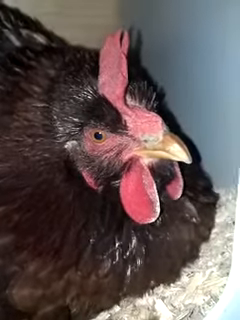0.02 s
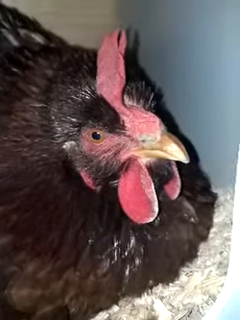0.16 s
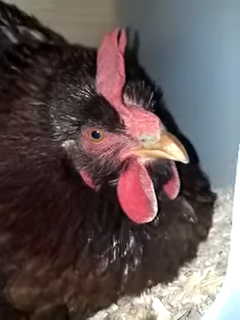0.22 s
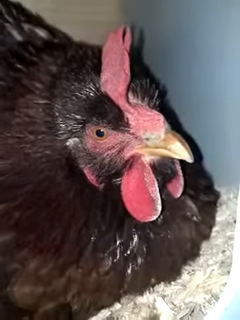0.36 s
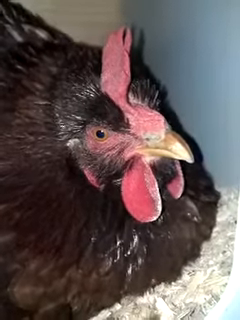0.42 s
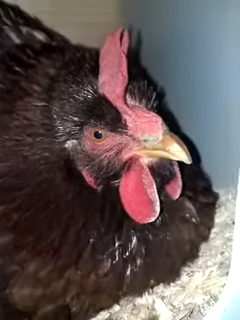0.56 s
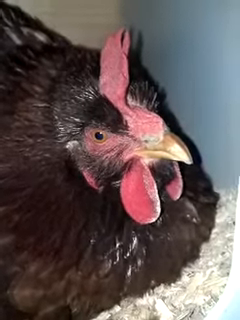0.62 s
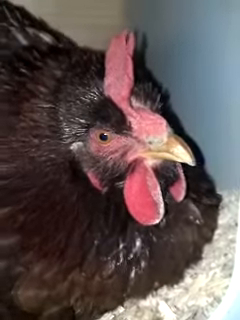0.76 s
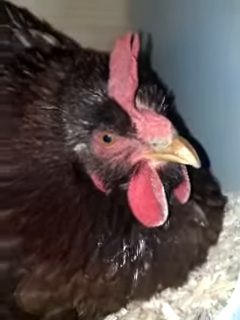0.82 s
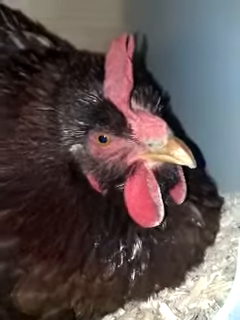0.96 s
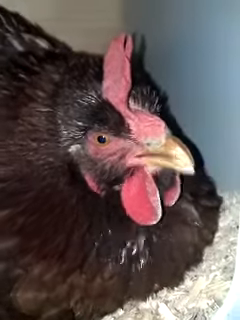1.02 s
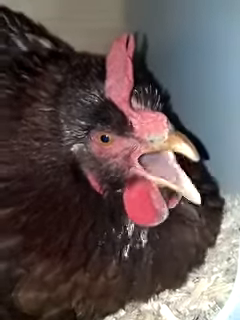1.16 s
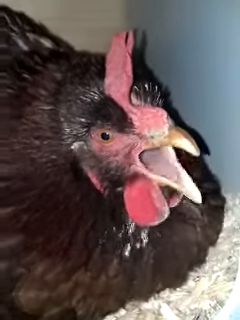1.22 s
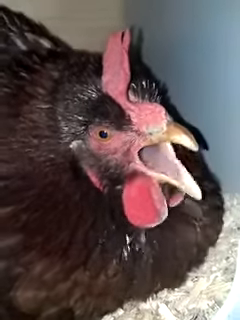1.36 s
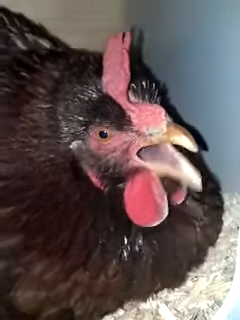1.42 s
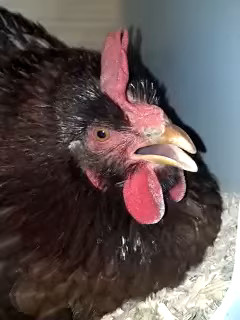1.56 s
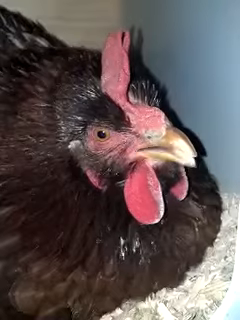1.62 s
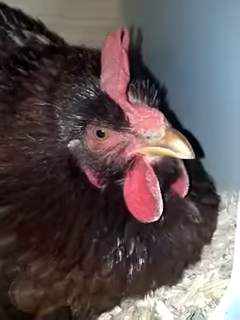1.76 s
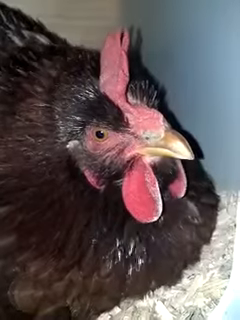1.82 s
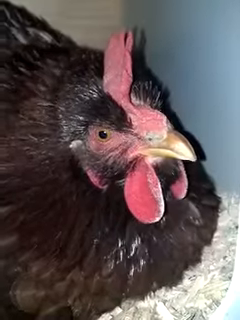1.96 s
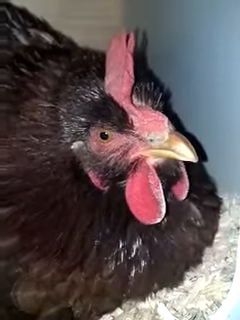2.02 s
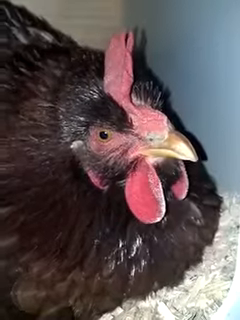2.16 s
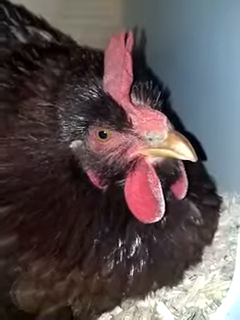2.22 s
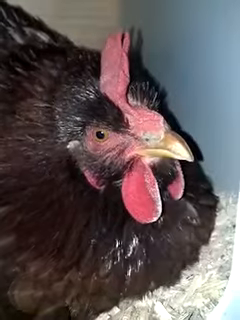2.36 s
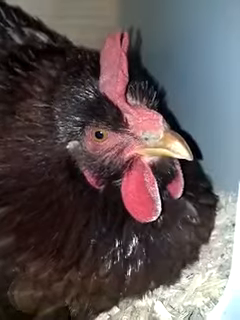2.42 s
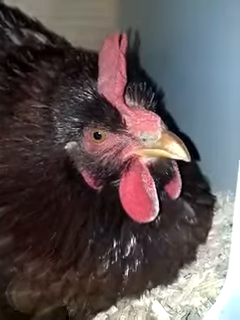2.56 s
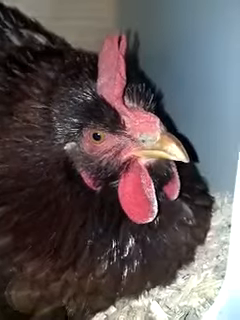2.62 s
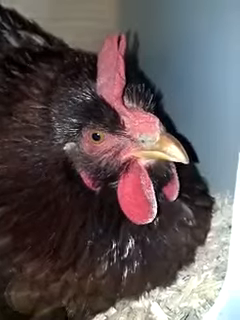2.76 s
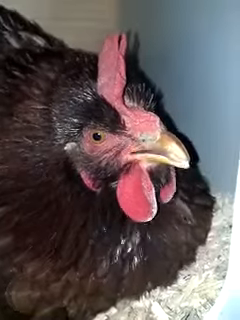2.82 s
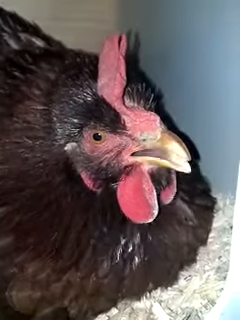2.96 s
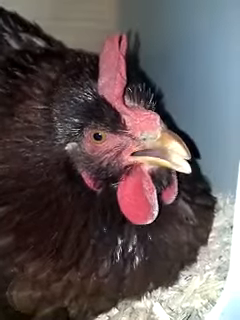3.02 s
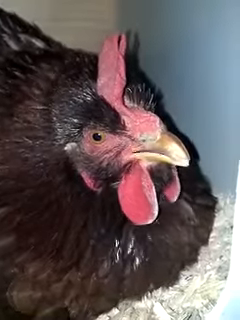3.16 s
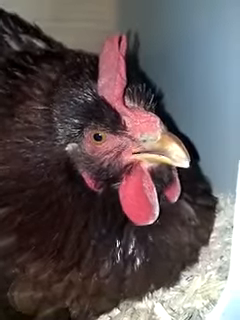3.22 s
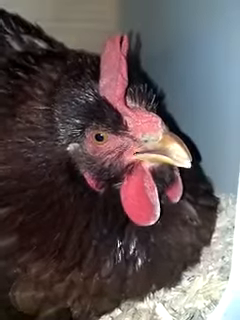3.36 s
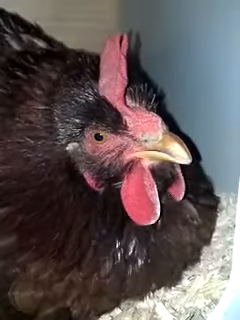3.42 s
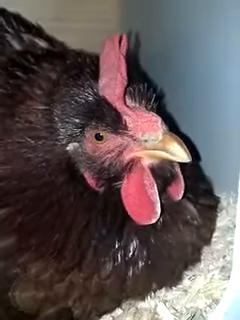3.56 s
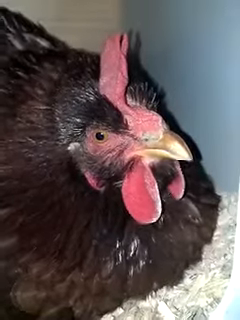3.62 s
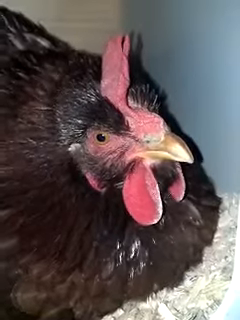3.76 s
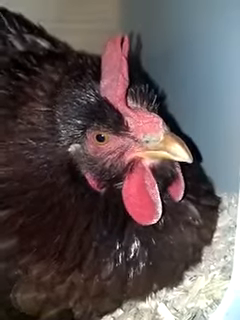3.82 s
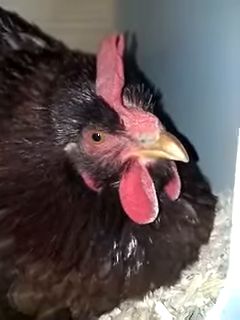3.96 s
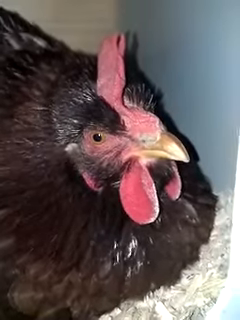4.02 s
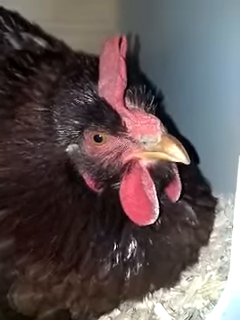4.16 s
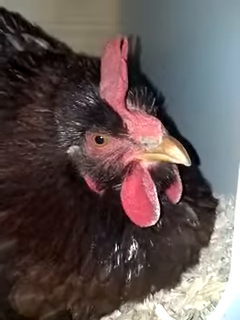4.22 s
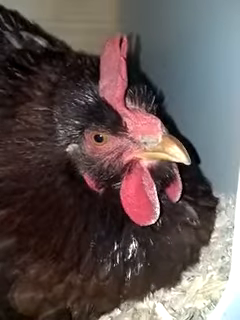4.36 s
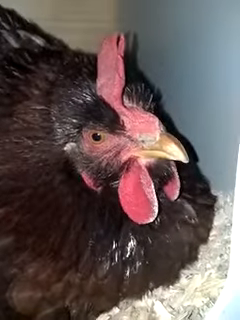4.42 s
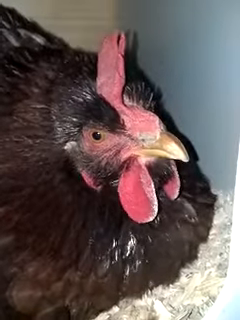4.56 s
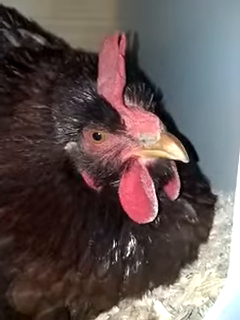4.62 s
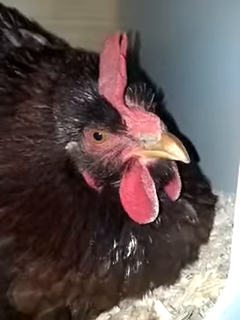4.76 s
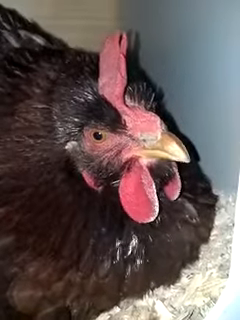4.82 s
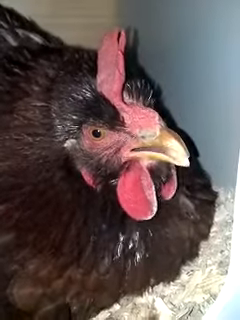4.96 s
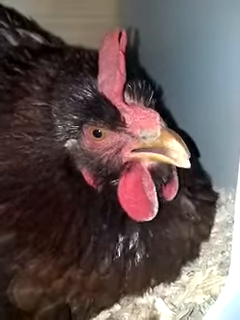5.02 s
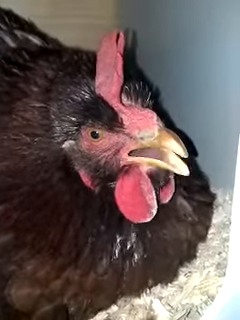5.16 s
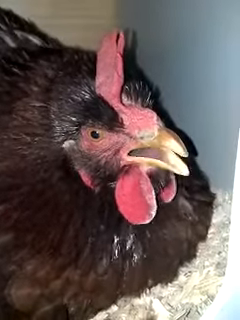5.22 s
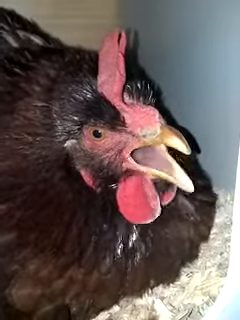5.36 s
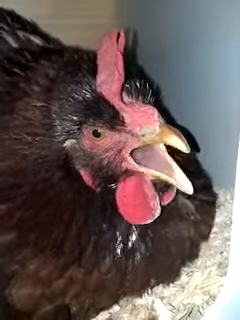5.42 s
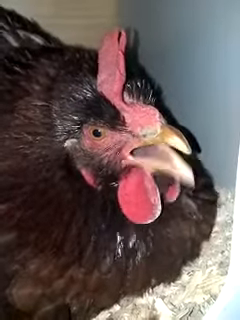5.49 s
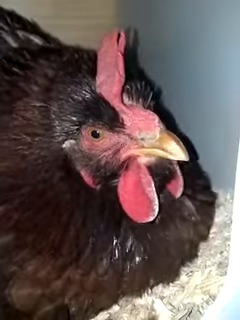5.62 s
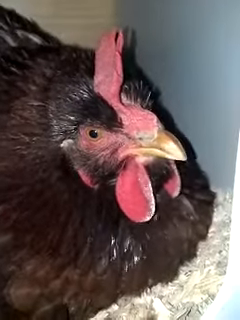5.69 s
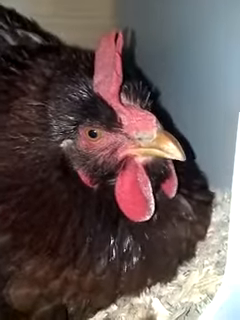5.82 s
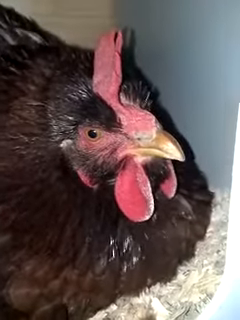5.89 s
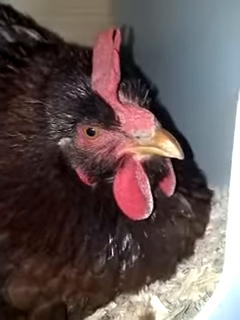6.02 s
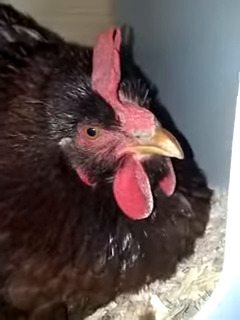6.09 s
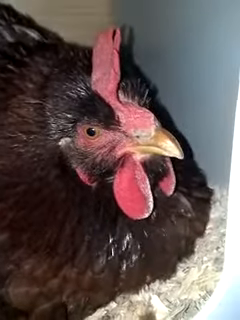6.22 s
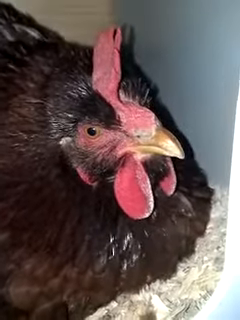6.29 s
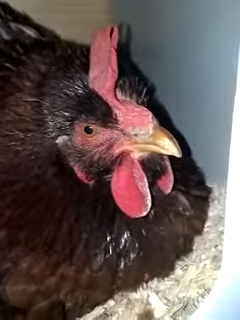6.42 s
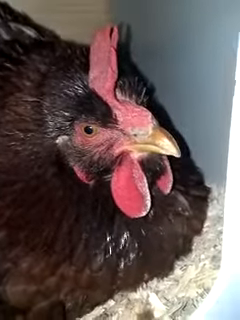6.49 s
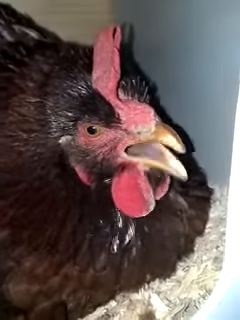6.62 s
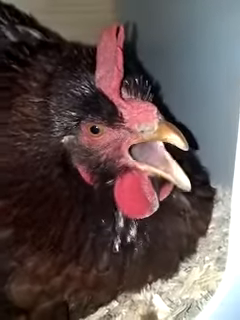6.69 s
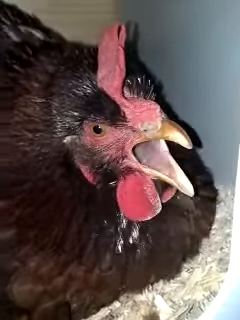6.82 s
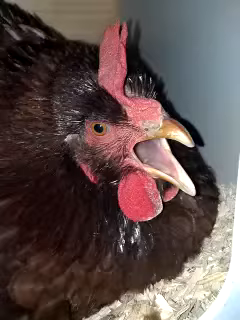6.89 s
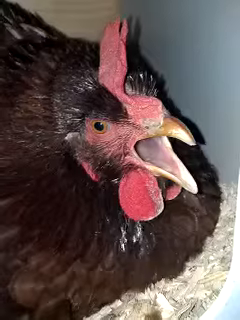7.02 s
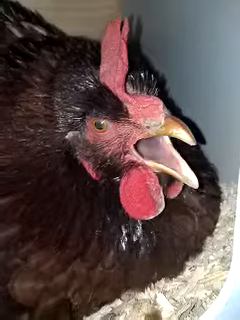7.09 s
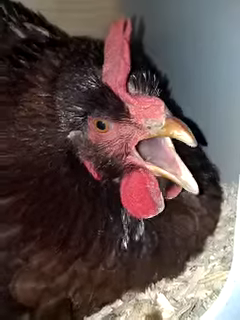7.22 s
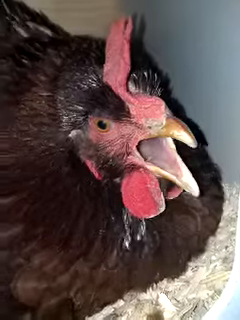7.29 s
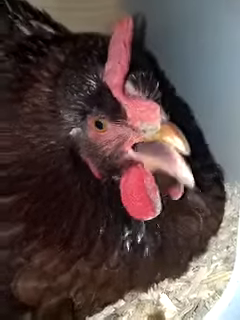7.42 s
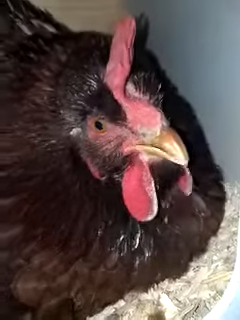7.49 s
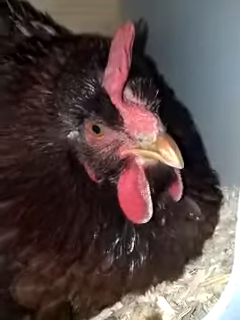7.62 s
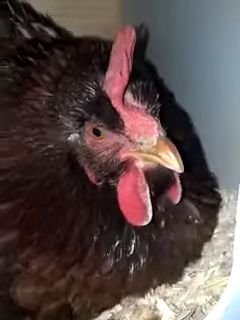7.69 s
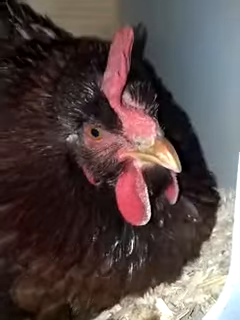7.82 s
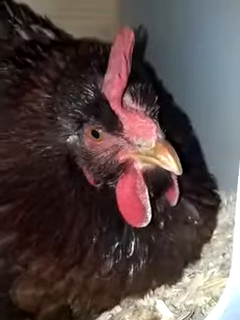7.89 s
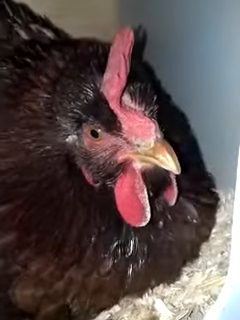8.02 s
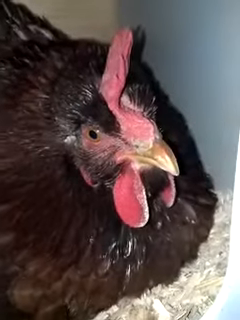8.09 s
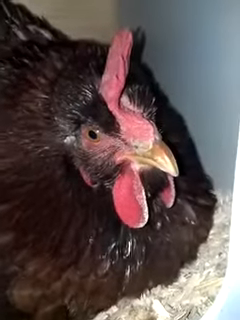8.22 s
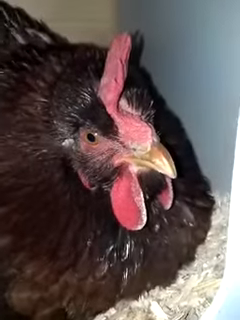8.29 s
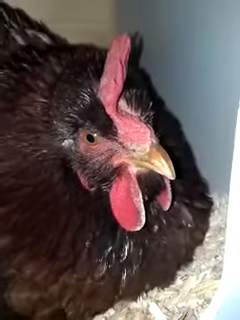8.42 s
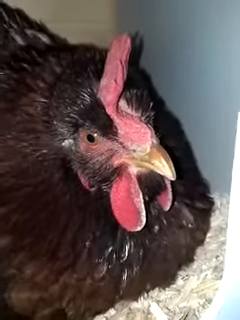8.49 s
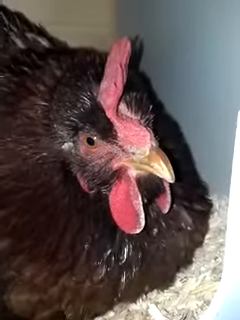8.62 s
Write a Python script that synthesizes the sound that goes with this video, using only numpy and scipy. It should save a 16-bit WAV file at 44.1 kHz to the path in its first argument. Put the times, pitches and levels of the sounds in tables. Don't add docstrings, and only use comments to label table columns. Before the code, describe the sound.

Close stereo pickup of a hen in a boarded nest box with a brief woody ring. Dry, rough clucks come in short runs, separated by four harsh drawn-out calls of about half a second to nearly a second, some ending in a clean falling tone. Two squawks slide upward in pitch, the first much louder. Far low droning and soft airy hiss fill the gaps, sinking after loud calls.

```python
import sys
import numpy as np
from scipy import signal
from scipy.fft import rfft, irfft, next_fast_len
from scipy.io import wavfile
from scipy.ndimage import uniform_filter1d

SR = 44100
rng = np.random.default_rng(int(sys.argv[2]) if len(sys.argv) > 2 else 0)


def voltage_ratio(level):
    return 10 ** (np.asarray(level, float) / 20)


def generate_wav(sig):
    pcm = np.round(np.clip(np.atleast_2d(sig).T, -1, 1) * 32767).astype(np.int16)
    wavfile.write(sys.argv[1], SR, pcm)


N = 381906


def unit(x):
    return x / np.sqrt(np.mean(x ** 2) + 1e-20)


def curve(rows, column):
    rows = np.array(rows)
    return np.interp(np.arange(N) / SR, rows[:, 0], rows[:, column])


def bursts(tables, fade_s=0.012):
    rows = np.concatenate(tables)
    t = np.arange(N) / SR
    gate = 0
    for table in tables:
        inside_s = np.minimum(t - table[0][0], table[-1][0] - t)
        gate = gate + np.clip(inside_s / fade_s + .5, 0, 1)
    return [gate] + [curve(rows, k) for k in range(1, rows.shape[1])]


def drift(rate_hz):
    r = np.exp(-2 * np.pi * rate_hz / SR)
    wander = signal.lfilter([1], [1, -2 * r, r * r], rng.standard_normal(N + 9000))
    return unit(wander[9000:])


def resonate(x, modes):
    out = 0
    for k, (hz, width_hz, db) in enumerate(modes):
        r = np.exp(-np.pi * width_hz / SR)
        ring = signal.lfilter([1, 0, -1], [1, -2 * r * np.cos(2 * np.pi * hz / SR), r * r], x)
        out = out + (-1) ** k * voltage_ratio(db) * (1 - r * r) / 2 * ring
    return out


def even(x, span_s=0.14):
    return x / np.sqrt(uniform_filter1d(x ** 2, int(span_s * SR)) + 1e-12)


def steep(x, low_hz):
    return signal.sosfilt(signal.butter(4, low_hz, "high", fs=SR, output="sos"), x)


def rumble():
    modes = [(127.0, 2.2, 8), (171.7, 67, 3.0), (78.0, 56, -8.0)]   # (Hz, width Hz, dB)
    left, other = [unit(resonate(rng.standard_normal(N), modes)) for side in range(2)]
    level = voltage_ratio(-49 + 3.5 * drift(4.5))
    return level * np.array([left, 1.2 * other - 0.28 * left])


# (frequency [Hz], level per Hz [dB])
HISS = [(200, 14), (300, 2), (450, 6.5), (1000, 1), (1600, -6.5), (2700, -14), (4000, -15), (6000, -22.5),
        (10000, -27.5)]


def hiss():
    hz, points = np.fft.rfftfreq(N, 1 / SR) + 1, np.array(HISS)
    level_db = np.interp(np.log(hz), np.log(points[:, 0]), points[:, 1])
    gain = voltage_ratio(level_db) / (1 + (180 / hz) ** 4)
    return unit(irfft(rfft(rng.standard_normal(N)) * gain, N))


# (time [s], length [s], level [dB], pitch [Hz])
DRONE = [(.32, 0.14, -52.5, 112), (0.726, 0.96, -54, 163), (.9, 0.12, -55, 148.4), (2.17, 0.089, -48, 129),
         (3.3, .3, -59, 130), (4.076, 0.49, -57.5, 112), (4.58, 0.094, -62, 112), (5.032, 0.3, -50.5, 125),
         (6.15, .08, -57.5, 115), (6.331, 0.14, -54, 115.2), (6.547, 0.13, -54, 130),
         (7.397, 0.16, -53, 122), (8.357, 0.29, -57.5, 105)]


def drone():
    t = np.arange(N) / SR
    turn = 2 * np.pi * np.cumsum(np.exp(0.017 * drift(3.4))) / SR
    port_phase_rad = np.array([[0], [1.97]])
    swells = 0
    for s, length, db, hz in DRONE:
        swell = voltage_ratio(db) * np.exp(-(2 * (t - s) / length) ** 2)
        swells = swells + swell * np.sin(hz * turn + port_phase_rad)
    return swells * voltage_ratio(5.0 + 2.0 * drift(8))


def flapping(rate_hz, jitter, shimmer_db, throb_db, stray_per_s):
    cycles = np.cumsum(rate_hz * np.exp(jitter * drift(250))) / SR
    closes = np.diff(np.floor(cycles), prepend=0) > 0
    stray = (rng.random(N) < stray_per_s / SR) * rng.choice([-1, 1], N)
    beat = np.cumsum(49 * np.exp(.09 * drift(10))) / SR % 1
    burst = np.minimum(20 * beat, 2 - 2 * beat) - 1
    throb = throb_db * burst * voltage_ratio(1.5 * drift(12))
    strength = voltage_ratio(shimmer_db * rng.standard_normal(N) + throb + 0.65 * drift(45))
    slaps = (closes + 0.84 * stray) * strength
    puffs = signal.lfilter([1], [1, -.93], np.abs(slaps)) * rng.standard_normal(N)
    return slaps + 1e-18, slaps + 0.23 * puffs


# (time [s], peak level [dB], length [s], middle band against peak [dB])
CLUCKS = [(0.404, -31.5, 0.1, -33), (0.656, -31, 0.082, -34), (0.928, -25, 0.088, -19),
          (1.823, -37.5, .06, -14.5), (2.045, -35.5, .08, -14), (2.249, -31, 0.08, -12.5),
          (2.519, -29, 0.095, -16), (2.734, -25.5, 0.097, -20), (3.722, -28, 0.16, -16),
          (3.923, -24.5, 0.14, -18), (4.145, -22, 0.26, -15.5), (4.867, -19.5, 0.12, -15),
          (6.141, -37.5, 0.05, -14.5), (6.352, -32, 0.12, -14.5), (7.604, -34.5, 0.12, -11.5),
          (8.299, -25, 0.32, -11), (8.641, -30, 0.04, -8.5)]
# (frequency [Hz], width [Hz], level [dB])
THROAT_SHUT = [(600, 490, -7.5), (847, 121.6, 8), (1077, 56.4, 5.5), (1250, 530, -14.5), (2013, 250, -18.5),
               (2800, 120, -25)]
# (frequency [Hz], width [Hz], level [dB])
BEAK = [(2050, 350, -6), (2450, 300, -5), (2950, 260, -3), (3500, 220, 1), (4000, 220, -2), (4400, 300, -6),
        (4900, 500, -11)]
# (frequency [Hz], width [Hz], level [dB])
BEAK_TOP = [(5500, 700, -7), (6050, 300, -4), (6400, 250, -1), (6800, 250, 0), (7350, 250, -4),
            (8250, 500, -4), (9000, 450, -3), (9650, 350, -6), (10700, 600, -11)]


def clucks():
    attack_s, start_db, fall_db_per_s, slap_db = 0.037, -11.5, 518.5, 7.5
    tables = []
    opening = np.zeros(N)
    for s, db, length, mid_db in CLUCKS:
        fall_s = length - .03
        peak_s = s + attack_s
        tables.append([(s, db + start_db, mid_db), (peak_s, db, mid_db),
                       (peak_s + fall_s, db - fall_db_per_s * fall_s, mid_db)])
        opening[round((s + .003) * SR)] = voltage_ratio(db + slap_db)
    gate, low_db, mid_db = bursts(tables, fade_s=.002)
    slaps, airy = flapping(410, jitter=.16, shimmer_db=2.5, throb_db=1.0, stray_per_s=270)
    low = even(steep(resonate(slaps, THROAT_SHUT), 260), span_s=0.032)
    mid = voltage_ratio(mid_db - 9.0) * even(steep(resonate(airy, BEAK), 1600), span_s=0.0068)
    top = voltage_ratio(mid_db - 19.0) * even(steep(resonate(airy, BEAK_TOP), 5400), span_s=.03)
    slap = resonate(opening + 1e-18, [(800, 830, -15.0), (3390, 2700, -19.0)])
    return gate * voltage_ratio(low_db + 3.0) * (low + mid + top) + slap


# (time [s], peak level [dB], pitch [Hz], time to die by 60 dB [s])
POPS = [(0.867, -40.5, 1550, 0.029), (.987, -23.5, 520, 0.036), (.987, -27.5, 223.7, 0.044),
        (1.027, -20, 646, 0.015), (1.042, -18.5, 660, 0.037), (1.061, -30.5, 631, 0.044),
        (2.785, -35, 209, 0.089), (2.787, -25.5, 595, 0.022), (4.837, -25, 622, 0.017),
        (5.621, -39, 205, 0.05), (6.545, -26.5, 572, 0.016), (7.541, -39.5, 218, 0.047)]


def pops():
    out, t = np.zeros(N), np.arange(int(.06 * SR)) / SR
    for s, db, hz, t60 in POPS:
        ring = np.sin(2 * np.pi * hz * t) * voltage_ratio(-60 * t / max(t60, .004))
        click = 0.2 * rng.standard_normal(len(t)) * voltage_ratio(-60 * t / 0.012)
        out[round(s * SR):][:len(t)] += voltage_ratio(db + 5.5) * (ring + click)
    return steep(out, 120)


# (time [s], effort [dB], beak opening [0-1])
WAILS = [
    [(1.066, -29.5, .5), (1.14, -31.5, .88), (1.274, -29, .94), (1.41, -29.5, .92), (1.622, -34, 0.83),
     (1.674, -41.5, .95), (1.708, -61.5, 0.6)],
    [(2.81, -64.5, 0.21), (2.83, -37, 0.19), (2.92, -30.5, 0.57), (3.036, -28.5, .7), (3.162, -29.5, 0.58),
     (3.45, -27.5, 0.58), (3.475, -38.5, 0.2), (3.51, -51, 0.11)],
    [(4.92, -32.5, 0.25), (5.04, -30, 0.63), (5.1, -25.5, 0.57), (5.16, -29.5, 0.68), (5.432, -29, 0.93),
     (5.576, -34, 0.8), (5.62, -44, 0.61), (5.645, -76, 0.38)],
    [(6.555, -41.5, 0.23), (6.6, -36.5, 0.43), (6.69, -31, 0.88), (7.081, -28.5, 0.97), (7.36, -27, 0.97),
     (7.41, -36.5, 1), (7.55, -51.5, 0.78)],
]
LOOSENESS = [.25, 1, 1, .15]
# (time [s], effort [dB], beak opening [0-1])
SQUAWKS = [
    [(4.258, -25.5, .1), (4.276, -19.5, .45), (4.376, -32.5, .5), (4.49, -41.5, .7), (4.52, -20, .5),
     (4.56, -34.5, 0.27), (4.61, -46, 0.22)],
    [(7.712, -40, .5), (7.74, -34, .8), (7.81, -54.5, .6), (7.925, -38.5, .85), (7.955, -26, 0.4),
     (7.99, -38, .4), (8.04, -50, 0.27)],
]
# (frequency [Hz], width [Hz], level [dB])
THROAT_OPEN = [(560, 375, 3), (670, 773, 10.5), (1091, 165, 22), (1550, 2100, -14.5), (2060, 160, -0.5)]


def harsh_calls():
    gate, effort_db, beak = bursts(sorted(WAILS + SQUAWKS))
    squawk = bursts(SQUAWKS)[0] > 0
    beak = np.clip(beak, 0, 1)
    rate_hz = 529.3 + (806 - 529.3) * beak

    slack = []
    for rows, looseness in zip(WAILS, LOOSENESS):
        start_s, end_s = rows[0][0], rows[-1][0]
        slack.append([(start_s, looseness, 0), (end_s, looseness, end_s - start_s)])
    loose, age_s = bursts(slack)[1:]
    half_open = 4 * beak * (1 - beak) * loose * ~squawk
    coarser_db = 3.0 * half_open
    coarse_db = 1.5 + coarser_db
    throb_db = 1.5 + 2.4 * coarser_db * np.exp(-age_s / .45)
    slaps, airy = flapping(rate_hz, jitter=.11, shimmer_db=1.0, throb_db=throb_db, stray_per_s=380)

    low = even(steep(resonate(slaps, THROAT_OPEN), 480))
    chest = even(steep(resonate(slaps, [(520, 260, 0), (1080, 260, -3)]), 300))
    low += voltage_ratio(3.0 * coarse_db - 12) * chest

    loss_db = -5 * bursts(LOCKED, fade_s=.05)[0] - 14 * half_open
    boost_db = np.clip(1.5 * SR * uniform_filter1d(np.gradient(beak), 2000), 0, 8)
    turn = 2 * np.pi * np.cumsum(rate_hz * np.exp((.01 + .012 * coarse_db) * drift(22))) / SR
    push = even(uniform_filter1d(np.abs(slaps), 260))
    low += voltage_ratio(-9.5 + loss_db) * push * (.2 + drift(45)) * np.sin(turn)
    low += voltage_ratio(-5.5 + loss_db + boost_db) * (.9 + .7 * drift(33)) * np.sin(2 * turn)
    low = np.where(squawk, steep(low, 910), low)

    mid = voltage_ratio(-24.5 + 26.13 * beak) * even(steep(resonate(airy, BEAK), 1750))
    top = voltage_ratio(-49 + 41.5 * beak) * even(steep(resonate(airy, BEAK_TOP), 5000))
    return gate * voltage_ratio(effort_db + 5.0) * (low + mid - top)


# (time [s], pitch [Hz], level [dB])
LOCKED = [
    [(1.38, 560, -36), (1.425, 557.7, -30), (1.552, 508.6, -30.5), (1.622, 527.5, -32), (1.665, 491, -30.5),
     (1.69, 438.9, -33.5), (1.705, 425, -71)],
    [(4.265, 458.8, -21.5), (4.357, 535.2, -16.5), (4.469, 571.8, -19.5), (4.487, 579.8, -16.5),
     (4.52, 601.2, -18)],
    [(5.42, 502, -50), (5.478, 545.2, -32.5), (5.574, 480.5, -31.5), (5.625, 363.4, -49)],
    [(6.97, 560, -37), (7.05, 580, -36.5), (7.13, 551.8, -30.5), (7.25, 549.2, -47)],
    [(7.36, 599.9, -43), (7.39, 589.6, -29.5), (7.45, 612, -27), (7.485, 569.4, -25.5),
     (7.515, 503.7, -27.5), (7.545, 425, -50.5)],
    [(7.72, 467.2, -37), (7.802, 557.5, -29), (7.886, 560, -25.5), (7.91, 596, -27.5),
     (7.955, 635.6, -33.5)],
]
# (fundamental [dB], upper harmonics at middle pitch [dB])
BALANCE_DB = [(0.3, -7.5), (-23, -26), (-1, -6), (0.7, -5), (-3, -9.5), (-12.5, -20.5)]
# (frequency [Hz], level [dB])
LOCKED_COLOUR = [(1300, 3), (1700, 1), (2300, -7), (2900, 1.5), (3500, 3), (4200, 1), (5500, -5),
                 (7000, -11), (9500, -8), (11000, -29.5)]
# (frequency [Hz], level [dB])
SQUAWK_SHIFT = [(1300, 5.5), (2200, 25), (2500, 0), (3000, -11), (3400, 3)]


def locked_calls():
    tables = [[row + balance for row in rows] for rows, balance in zip(LOCKED, BALANCE_DB)]
    gate, pitch_hz, second_db, first_db, upper_db = bursts(tables, fade_s=0.003)
    first_db += second_db
    upper_db += second_db + 40 * np.log2(pitch_hz / 543.6)
    squawk = bursts([LOCKED[1], LOCKED[5]])[0] > 0
    turn = 2 * np.pi * np.cumsum(pitch_hz * np.exp(.006 * drift(84.4))) / SR
    colour, shift = np.array(LOCKED_COLOUR), np.array(SQUAWK_SHIFT)
    out = voltage_ratio(first_db + 4.0) * np.sin(turn) + voltage_ratio(second_db + 5.5) * np.sin(2 * turn)
    for k in range(3, 22):
        db = np.interp(np.log(k * pitch_hz), np.log(colour[:, 0]), colour[:, 1])
        db += squawk * np.interp(k * pitch_hz, shift[:, 0], shift[:, 1])
        flutter_db = 4 * drift(35)
        out += voltage_ratio(upper_db + db + flutter_db) * np.sin(k * turn + k * k * 0.45)
    return np.sqrt(2) * gate * out * voltage_ratio(2.2 * drift(30))


def nest_box(x):
    t60_s, cut_hz = .32, 6000
    size = next_fast_len(N + SR)
    hz = np.fft.rfftfreq(size, 1 / SR)
    lags = rng.uniform(0.0044, 0.013, (2, 6, 1))
    loop = voltage_ratio(-60 * lags / t60_s) * np.exp(-2j * np.pi * hz * lags) / (1 + 1j * hz / cut_hz)
    return irfft(rfft(x, size) * (loop / (1 - loop)).sum(axis=1), size)[:, :N]


# (frequency [Hz], width [Hz], level [dB])
WALL_RING = [(1140, 7, -9), (1000, 10, -15), (1190, 7, -10)]


def wall_ring(hen):
    return resonate(hen, WALL_RING)


# (frequency [Hz], level [dB], extra phase [rad])
PORT = [(97, -18, -0.3), (231, -0.5, -0.68), (480, -3.5, -1.1), (740, -8, -0.69), (1150, -5.5, 0.045),
        (1450, 2, -0.61), (2634, 2, -0.23)]


def two_ports(x):
    lag_s = 0.00035845
    size = next_fast_len(N + 2000)
    hz, port = np.fft.rfftfreq(size, 1 / SR) + 0.00084, np.array(PORT)
    db, extra = [np.interp(np.log(hz), np.log(port[:, 0]), port[:, k]) for k in (1, 2)]
    phase = np.pi - 2 * np.pi * hz * lag_s + extra
    return np.array([x, irfft(rfft(x, size) * voltage_ratio(db) * np.exp(1j * phase), size)[:N]])


def ducking(hen):
    from_db, share, span_s, recover_db_per_s, at_start_db = -42, 0.66, .8, 7.5, 10
    t = np.arange(N) / SR
    span = int(span_s * SR)
    loud_db = 10 * np.log10(np.abs(uniform_filter1d(hen ** 2, 2000)) + 1e-12)
    over_db = uniform_filter1d(np.maximum(loud_db - from_db, 0), span, origin=(span - 1) // 2)
    cut_db = np.maximum(share * over_db, at_start_db * (t == 0))
    recovery_db = recover_db_per_s * t
    return voltage_ratio(recovery_db - np.maximum.accumulate(cut_db + recovery_db))


def scene():
    hen = clucks() + pops() + harsh_calls() + locked_calls()
    duck = ducking(hen)
    hiss_gain = duck * voltage_ratio(-45 + 1.2 * drift(3.7))
    stray_hiss = voltage_ratio(-11.5) * hiss_gain * np.array([hiss(), hiss()])
    near = hen + wall_ring(hen) + hiss_gain * hiss()
    echoes = voltage_ratio(-27) * nest_box(hen)
    return two_ports(near) + stray_hiss + echoes + duck ** 1.4 * rumble() + drone()


def thin_stereo(x, weak_db, line_db, mask_db):
    hz, _, z = signal.stft([x[0] + x[1], x[0] - x[1]], SR, "cosine", 1024)
    edges = np.unique(np.geomspace(24, 512, 34).astype(int))
    power = np.abs(z) ** 2
    masking = uniform_filter1d(power.sum(axis=0), 61, axis=0)
    for low, high in zip(edges, edges[1:]):
        lines = power[:, low:high]
        band = lines.mean(axis=1, keepdims=True)
        strongest = band.max(axis=0, keepdims=True)
        thrift_db = 7.6 * uniform_filter1d(rng.standard_normal(band.shape), 3, axis=2)
        keep = band > strongest * voltage_ratio(2 * (weak_db + thrift_db))
        keep = keep & (lines > strongest * voltage_ratio(2 * line_db))
        z[:, low:high] *= keep & (lines > masking[low:high] * voltage_ratio(2 * mask_db))
    total, difference = signal.istft(z, SR, "cosine", 1024)[1][:, :N]
    return np.array([total + difference, total - difference]) / 2


def top_cut(x):
    return signal.sosfilt(signal.butter(12, 11530, fs=SR, output="sos"), x)


def record(dry):
    rounded = .8 * np.tanh(dry / .8)
    cut = signal.sosfilt(signal.cheby2(12, 60, 11500, fs=SR, output="sos"), rounded)
    cut = signal.sosfilt(signal.butter(2, 60, "high", fs=SR, output="sos"), cut)
    mix = thin_stereo(cut, weak_db=-10.5, line_db=-7.0, mask_db=-17.5)
    return top_cut(mix)


dry = scene()
out = record(dry)
generate_wav(out)
```